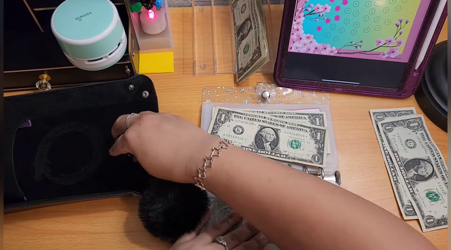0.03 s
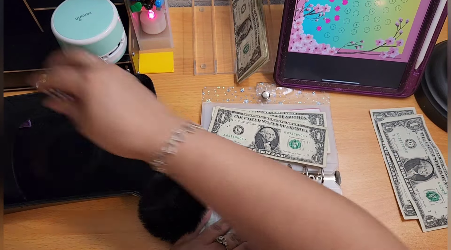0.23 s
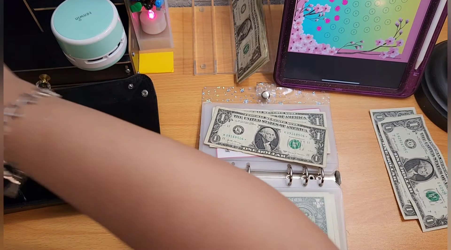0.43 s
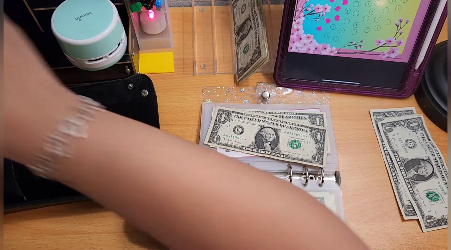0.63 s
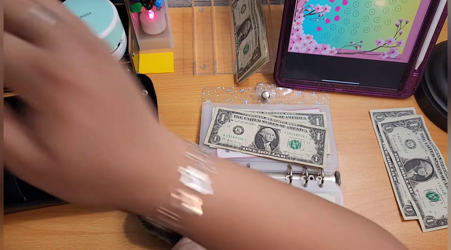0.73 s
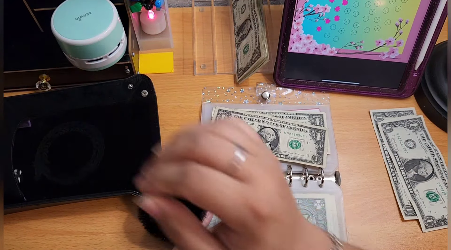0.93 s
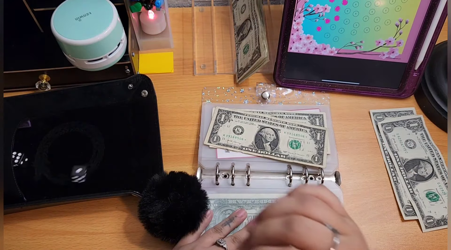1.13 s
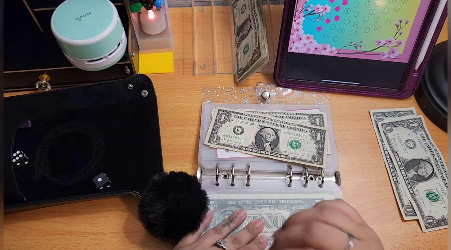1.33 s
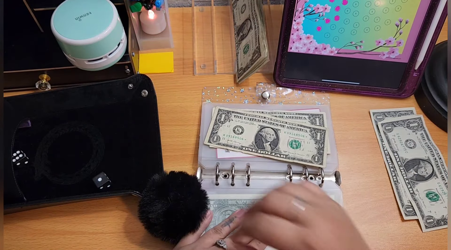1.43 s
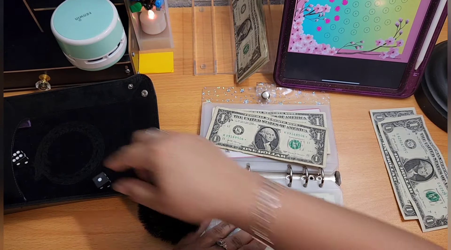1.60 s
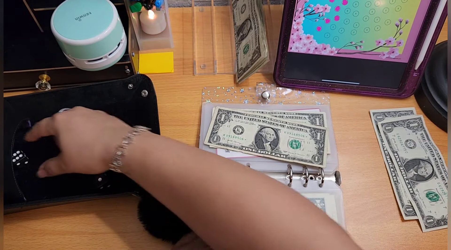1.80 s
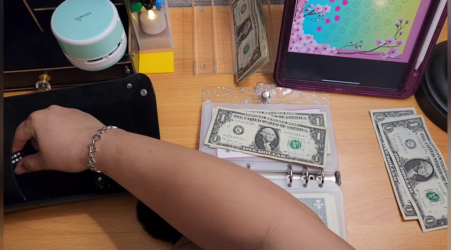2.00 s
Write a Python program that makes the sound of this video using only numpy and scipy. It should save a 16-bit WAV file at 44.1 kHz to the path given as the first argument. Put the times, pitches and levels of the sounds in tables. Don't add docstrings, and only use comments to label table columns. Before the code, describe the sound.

Dice roll in a felt-lined tray: fingers brush felt, two tiny clicks, then a thud with sharp knocks, several bounces and clacks, then a soft gathering brush; close stereo pickup in a small humming room.

```python
import sys
import numpy as np
from scipy import signal
from scipy.io import wavfile
from scipy.ndimage import map_coordinates

SR = 44100
rng = np.random.default_rng(int(sys.argv[2]) if len(sys.argv) > 2 else 0)


def store_pcm(level_fs):
    pcm = np.round(np.clip(level_fs, -1, 1) * 32767).astype(np.int16)
    wavfile.write(sys.argv[1], SR, np.atleast_2d(pcm).T)


def attenuation_scalar(level_db):
    decades = np.asarray(level_db, float) / 20
    return 10 ** decades


N = 90493

# [f/Hz, width/Hz, level/dB]
AIR_BOOMS = [(62, 12, -50.5), (83.3, 11.9, -43.5), (120.8, 16, -47), (40, 38, -53)]
# [f/Hz, density level/dB]
BACKGROUND_SPECTRUM = [(140, -2), (185, -16), (250, -8.5), (490, -26), (900, -34.5), (2200, -39.5),
                       (3000, -50), (10000, -69.5)]
# [f/Hz, correlation -1 to 1]
EAR_CORRELATION = [(60, 0.99), (240, 0.9), (950, 0.14), (3770, 0.19), (15000, 0.25)]
# [t/s, level/dB]
FINGER_LEVELS = [
    (0, -61),
    (.1, -58),
    (.2, -74),
    (0.229, -110),
    (1.821, -110),
    (1.86, -91.5),
    (1.93, -65),
    (1.95, -55.5),
    (2.05, -74),
]
# [f/Hz, density level/dB]
FELT_SPECTRUM = [(1500, -1), (4000, -0.5), (8000, -9.5), (15000, -11)]
# [t/s, level/dB]
STIR_LEVELS = [(.2, -86.5), (.3, -81.5), (.45, -76), (.58, -80), (.9, -75.5), (1.25, -74), (1.42, -76.5),
               (1.55, -92), (1.8, -83.5)]
# [f/Hz, density level/dB]
CLOTH_SPECTRUM = [(700, -6), (2000, -0.5), (5000, -3.5), (8500, -8), (10000, -30.5)]
# [t/s, peak level/dB, share of upper modes 0-1, brightness f/Hz, chatter t/ms]
DICE_CONTACTS = [(0.0309, -26, 0.96, 15000, 1.0), (0.0377, -24.5, 0.64, 9700, .6),
                 (0.042, -49, 0.7, 12000, 3.0), (0.086, -55, .1, 5000, 0.63), (.195, -64, 1, 14900, 0.95),
                 (.6268, -20.5, 0.51, 8560, 2.5), (0.6345, -28, 0.96, 11300, 2.0),
                 (0.6382, -36.5, .6, 11000, 2.5), (0.9953, -38, .4, 11000, 4.0),
                 (1.0963, -15, 0.63, 8900, .25), (1.0988, -20.5, 0.66, 9600, .3),
                 (1.1034, -41, 0.7, 9000, 2.7), (1.849, -60, 0.76, 11500, 1.6),
                 (1.911, -55.5, 0.2, 5000, 7.2), (1.9344, -24, 1, 15000, 2.39),
                 (1.9352, -29, 0.3, 15200, 2.8), (1.9452, -30.5, 1, 15000, 5.3),
                 (2.015, -46.5, 0, 6000, .8)]
# [f/Hz, level/dB, T60/s]
DIE_LOWER_MODES = [(2100, -18, .003), (3200, -8, .003), (4200, -4, .004), (5040, -1, .003)]
# [f/Hz, level/dB, T60/s]
DIE_UPPER_MODES = [(6600, 0, .0022), (8260, -1, .002), (10500, -5, .0018), (13500, -9, .0013)]
# [f/Hz, T60/s, level/dB]
ROOM_DECAY = [(300, 0.55, -25.5), (960, 0.35, -19.5), (2500, 0.21, -15.5), (6000, 0.27, -18),
              (12600, 0.12, -14)]
# [t/s, peak level/dB, pitch f/Hz, fade t/ms]
FELT_LANDINGS = [(0.6249, -10, 560, 1.6), (0.6285, -9, 540, 1.14), (0.634, -24.5, 300, 1),
                 (0.6591, -14.5, 800, 0.86), (.672, -20.5, 314, 1.55), (.775, -41.5, 564, 0.9),
                 (0.802, -32, 858, 1.73), (.810, -29.5, 345, 1), (.852, -45.5, 654.4, 1.5),
                 (.879, -29, 528, 1.8), (.904, -39, 583, 0.92), (0.93, -21.5, 634, 0.87),
                 (0.97, -23, 534.6, 1.5), (.9924, -12.5, 740, 1.2), (0.997, -19.5, 269.2, 1.3),
                 (1.04, -18.5, 552, 1.5), (1.109, -22.5, 300, 1), (1.166, -38, 400, 1.7),
                 (1.218, -32.5, 540, 1.1), (1.961, -50, 1247, 1), (2.014, -43.5, 1565, 1.3),
                 (2.016, -48.5, 500, 1.2)]
# [f/Hz, level/dB, T60/s]
TRAY_MODES = [(79.8, -24.5, 0.41), (129.7, -17, 0.17), (172, -24, 0.099), (292, -23, 0.18),
              (314.8, -23.5, 0.2), (420, -21, 0.055), (580, -21, 0.056), (737, -26, 0.082),
              (820, -23, 0.0417)]
# [t/s, peak level/dB, brightness f/Hz]
CORNER_KNOCKS = [(0.6263, -17, 2300), (.6594, -13.5, 2900), (.802, -41, 1103), (0.928, -36, 1500),
                 (0.937, -42.5, 2950), (0.9932, -9, 1400), (1.002, -17, 1400), (1.04, -28.5, 1200),
                 (1.111, -36.5, 2100), (1.219, -40, 1400), (1.652, -56.5, 3000), (1.946, -52, 2030),
                 (2.015, -65, 3520)]
# [f/Hz, level/dB, T60/s]
WALL_MODES = [(1030, -2, .008), (1200, 0, .008), (1435, 1, .010), (1750, -2, .006), (2250, -2, .007),
              (2700, -3, .005), (3200, -2, .004)]

HUM_HZ, HUM_DB, BACKGROUND_DB = 59.5, -43.5, -55.5
CHATTER_LOSS_DB, KNOCK_LOSS_DB, KNOCK_MS = 3, 2, 3
ROOM_GAP_S, EARLY_DB, EARLY_T60_S = 0.0025, 5, 0.12
THUD_PAN_DB, THUD_LAG_S = 3.5, 0.00015
CLICK_PAN_DB, CLICK_LAG_S = 4.5, 0.0004035
CUTOFF_HZ = 16000


def at_hz(points, hz, order=1):
    columns = np.array(points)
    return np.interp(np.log(hz), np.log(columns[:, 0]), columns[:, order])


def rms_one(x):
    return x / np.sqrt(np.mean(x ** 2) + 1e-20)


def ring(drive, hz, t60):
    radius = attenuation_scalar(-60 / (t60 * SR))
    angle = 2 * np.pi * hz / SR
    return signal.lfilter([0, np.sin(angle)], [1, -2 * radius * np.cos(angle), radius ** 2], drive + 1e-18)


def low_pass(x, hz, order):
    return signal.sosfilt(signal.butter(order, hz, fs=SR, output="sos"), x)


def bands(size, low_hz):
    white = rng.standard_normal((2, 2, size))
    edges = low_hz * 2 ** np.arange(0, np.log2(17000 / low_hz), 0.5)
    for k, (low, high) in enumerate(zip(edges, edges[1:])):
        band_pass = signal.butter(2, [low, high], "band", fs=SR, output="sos")
        yield np.sqrt(low * high), signal.sosfilt(band_pass, white[k % 2])


def hiss(spectrum, low_hz):
    out = 0
    for hz, (mid, side) in bands(N, low_hz):
        alike = np.clip(at_hz(EAR_CORRELATION, hz), -1, 1)
        common = np.sqrt(1 + alike) * mid
        opposed = np.sqrt(1 - alike) * side * [[1], [-1]]
        out = out + attenuation_scalar(at_hz(spectrum, hz)) * (common + opposed)
    return rms_one(out)


def curve(rows):
    t, db = np.transpose(rows)
    steps = N // 600 + 2
    uneven = np.interp(np.arange(N) / 600, np.arange(steps), rng.standard_normal(steps))
    return attenuation_scalar(np.interp(np.arange(N) / SR, t, db) + 2 * uneven)


def slips(s, db, length_ms, loss_db):
    delay = np.sort(rng.uniform(0.15, 1, 6))
    delay[0] = 0
    gains = attenuation_scalar(db - loss_db * np.arange(6)) * rng.choice([-1, 1], 6)
    return s + delay * length_ms / 1000, gains


def strike(times, gains, modes, spread_db):
    out = np.zeros(N)
    spread = rng.standard_normal((len(times), len(modes)))
    start = int(min(times) * SR)
    end = min(N, int(max(times) * SR) + SR // 4)
    hits = (times * SR).astype(int) - start
    for (hz, db, t60), own in zip(modes, spread.T):
        impulses = np.zeros(end - start)
        impulses[hits] = gains * attenuation_scalar(db + spread_db * own)
        out[start:end] += ring(impulses, hz, t60)
    return out


def dull(x, hz):
    return low_pass(x, min(hz, 18000), 3)


def late(x, seconds):
    return map_coordinates(x, [np.arange(N) - seconds * SR], order=3)


def hum():
    out = attenuation_scalar(HUM_DB) * np.sqrt(2) * np.sin(2 * np.pi * HUM_HZ * np.arange(N) / SR)
    for hz, width_hz, db in AIR_BOOMS:
        boom = rng.standard_normal(N + SR)
        for _ in range(2):
            boom = ring(boom, hz, 1.4 / width_hz)
        out = out + attenuation_scalar(db) * rms_one(boom[SR:])
    return out * attenuation_scalar([[0.45], [-0.45]])


def background():
    return attenuation_scalar(BACKGROUND_DB) * hiss(BACKGROUND_SPECTRUM, low_hz=130.25)


def rustle():
    fingers = curve(FINGER_LEVELS) * hiss(FELT_SPECTRUM, low_hz=1016)
    stir = curve(STIR_LEVELS) * hiss(CLOTH_SPECTRUM, low_hz=500)
    return fingers + stir


def clicks():
    out = 0
    for s, db, upper, hz, chatter_ms in DICE_CONTACTS:
        times, gains = slips(s, db + 3, chatter_ms, CHATTER_LOSS_DB)
        upper = np.clip(upper, 0, 1)
        lower_ring = strike(times, gains * (1 - upper), DIE_LOWER_MODES, spread_db=3)
        upper_ring = strike(times, gains * upper, DIE_UPPER_MODES, spread_db=3)
        out = out + dull(lower_ring + upper_ring, hz)
    return signal.sosfilt(signal.butter(3, 2800, "high", fs=SR, output="sos"), out)


def room(x):
    t = np.arange(SR // 2) / SR
    tail = 0
    for hz, band in bands(SR // 2, low_hz=200):
        decay_db = at_hz(ROOM_DECAY, hz, order=2) - 20 - 60 * t / at_hz(ROOM_DECAY, hz)
        tail = tail + band * attenuation_scalar(decay_db)
    tail = tail * (1 + attenuation_scalar(EARLY_DB - 60 * t / EARLY_T60_S))
    onset = np.clip(t / ROOM_GAP_S - 1, 0, 1)
    return signal.fftconvolve(x[None], tail * onset)[:, :N]


def thuds():
    push = np.zeros(N + 4096)
    t = np.arange(4096) / SR
    for s, db, hz, fade_ms in FELT_LANDINGS:
        start = int(s * SR)
        swell = t / (fade_ms / 1000)
        push[start:start + 4096] -= attenuation_scalar(db) * swell * np.exp(1 - swell) * np.sin(2 * np.pi * hz * t)
    s, db = np.transpose(FELT_LANDINGS)[:2]
    body = strike(s + 0.0014, attenuation_scalar(db), TRAY_MODES, spread_db=7)
    return push[:N] + low_pass(body, 1100, 2)


def knocks():
    out = 0
    for s, db, hz in CORNER_KNOCKS:
        times, gains = slips(s, db - 8, KNOCK_MS, KNOCK_LOSS_DB)
        out = out + dull(strike(times, gains, WALL_MODES, spread_db=3), hz)
    return out


def scene():
    click = clicks()
    thud = thuds() + knocks()
    left = thud * attenuation_scalar(THUD_PAN_DB / 2) + click * attenuation_scalar(CLICK_PAN_DB / 2)
    late_thud = late(thud, THUD_LAG_S) * attenuation_scalar(-THUD_PAN_DB / 2)
    late_click = late(click, CLICK_LAG_S) * attenuation_scalar(-CLICK_PAN_DB / 2)
    direct = np.array([left, late_thud + late_click])
    return direct + room(thud + click) + hum() + background() + rustle()


def band_limit(x):
    return signal.sosfilt(signal.butter(12, 16500, fs=SR, output="sos"), x)


def record(dry):
    top_cut = signal.cheby2(10, 60, CUTOFF_HZ + 500, fs=SR, output="sos")
    mix = signal.sosfilt(top_cut, dry)
    return band_limit(mix)


dry = scene()
out = record(dry)
store_pcm(out)
```